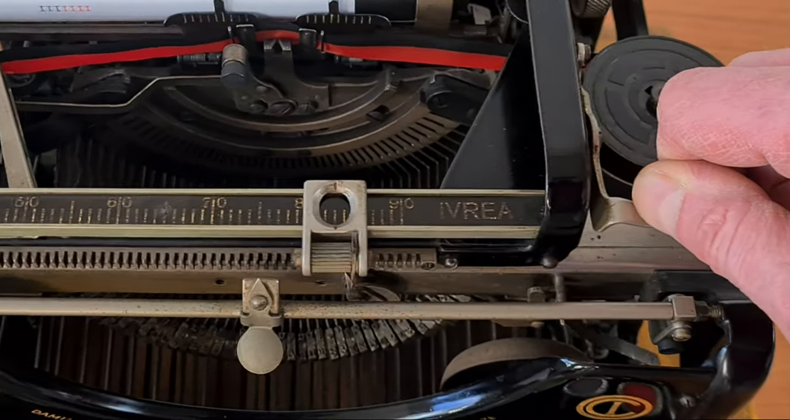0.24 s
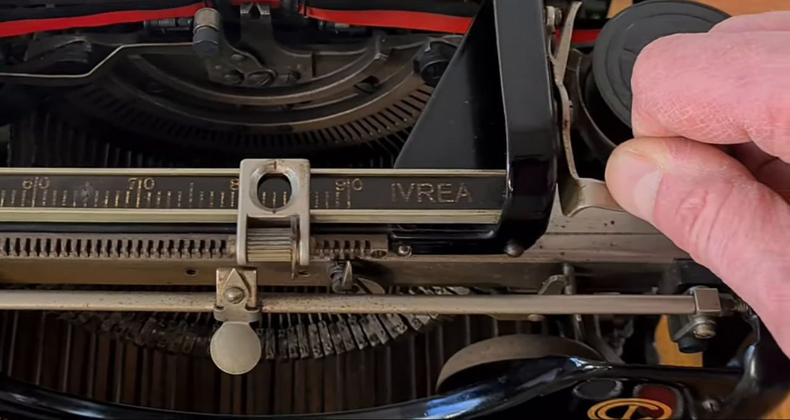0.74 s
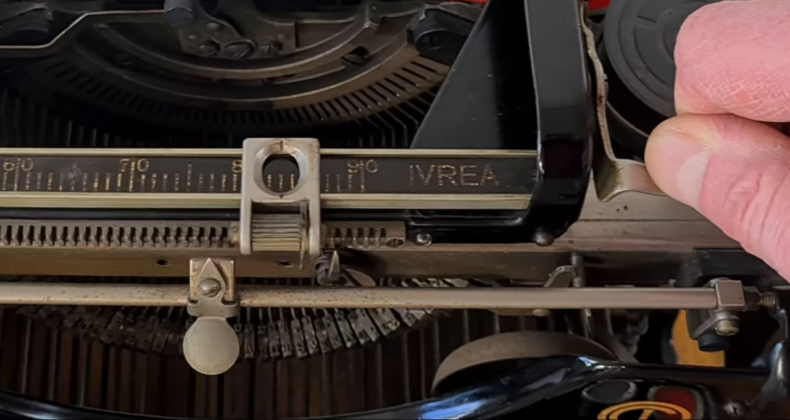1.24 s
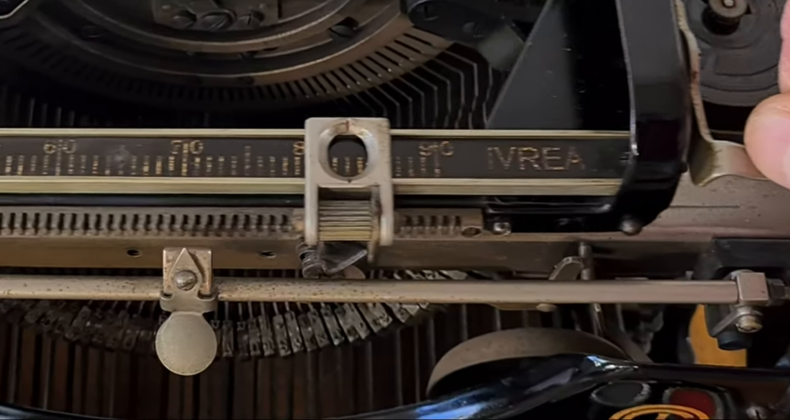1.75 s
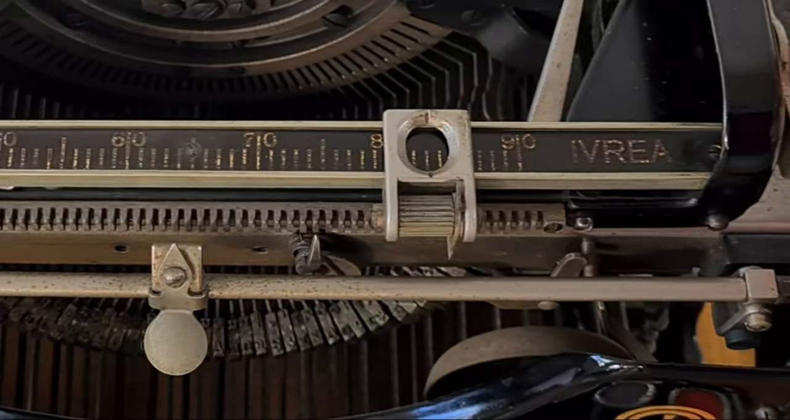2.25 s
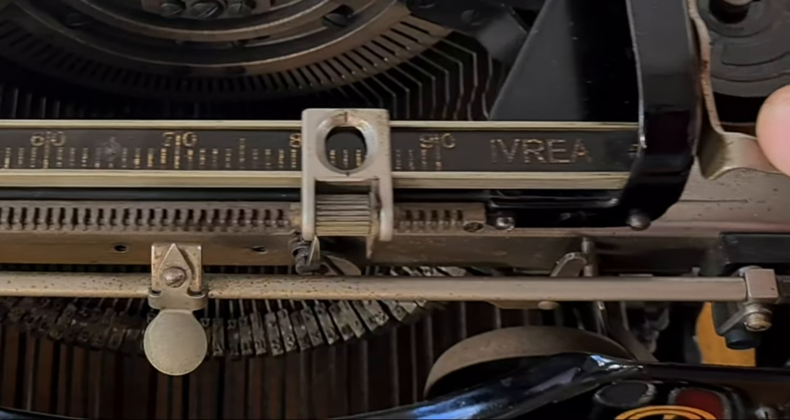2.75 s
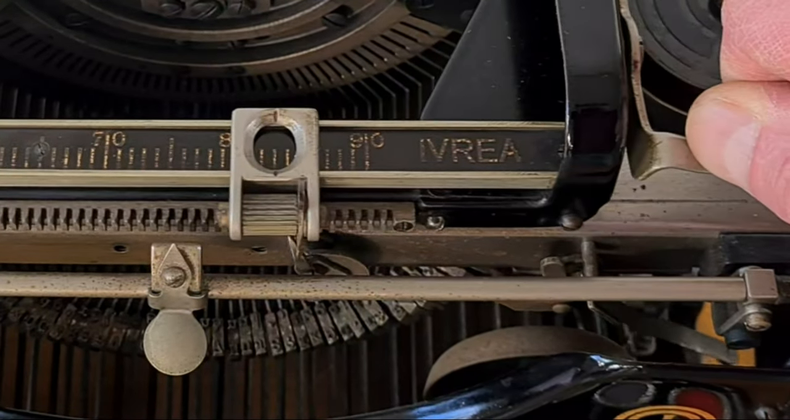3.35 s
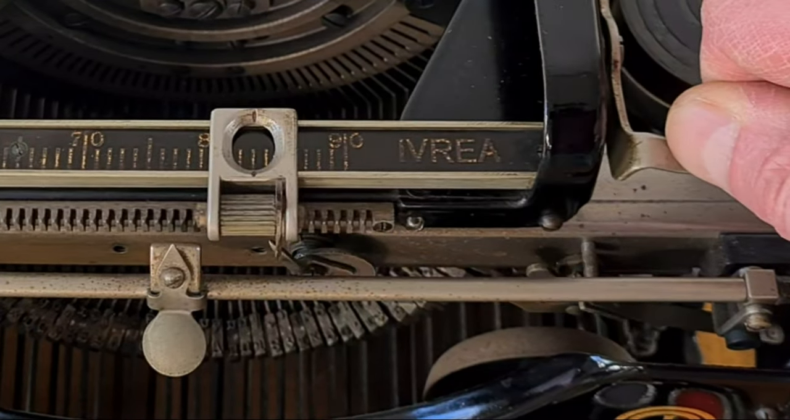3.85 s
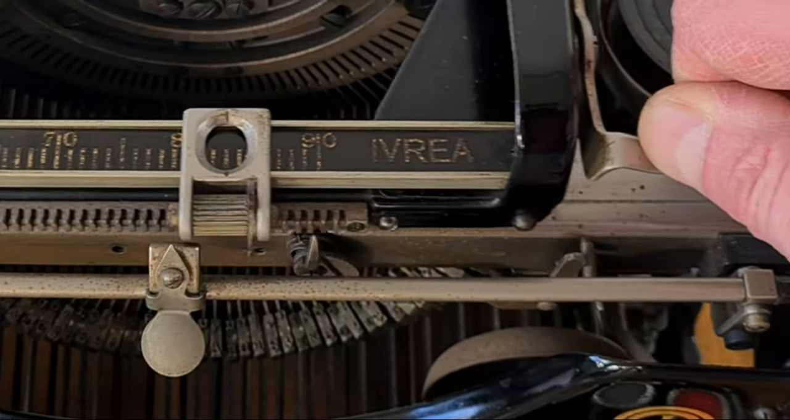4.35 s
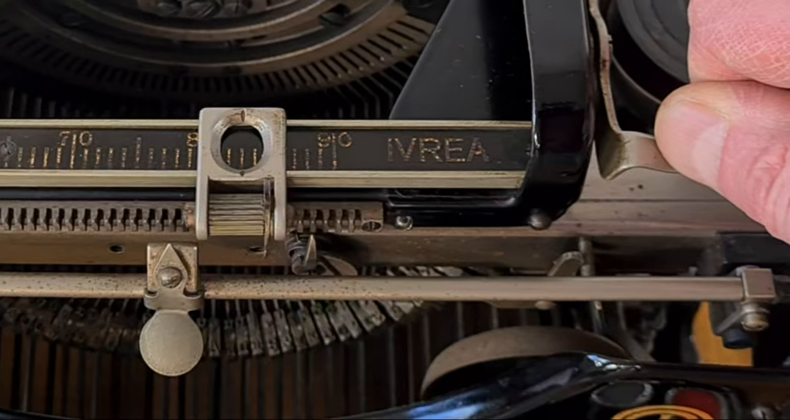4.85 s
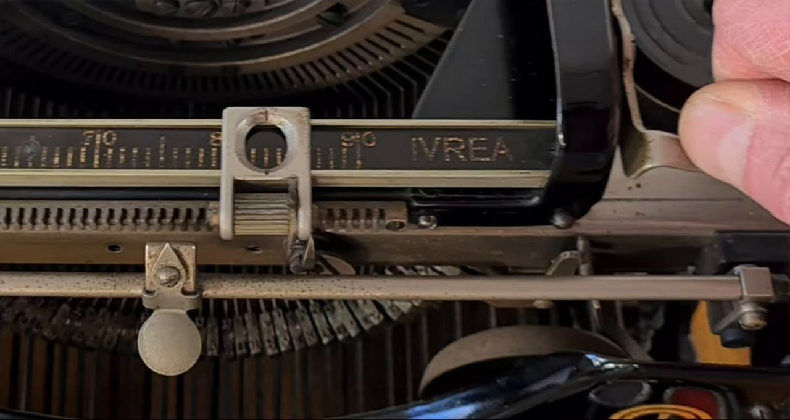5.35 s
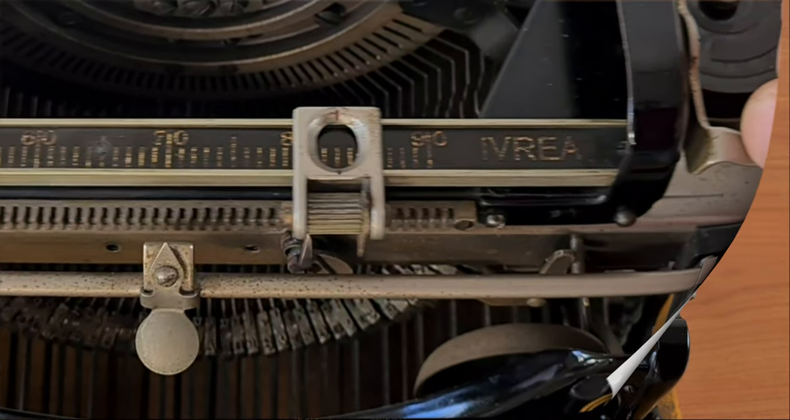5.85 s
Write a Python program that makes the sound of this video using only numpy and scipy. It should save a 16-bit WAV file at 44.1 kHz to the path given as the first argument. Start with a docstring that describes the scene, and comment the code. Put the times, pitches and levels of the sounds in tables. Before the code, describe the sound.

A typewriter carriage is eased back and forth by hand, very close to the microphones. Its stop trips a hammer: a hard clack with a high, shimmering ding that rings for seconds. Coming back, a pawl snaps dryly. After soft drumming and small ticks the ding repeats, then faint contacts lead to a final click. Quiet room, low rumble.

```python
"""Typewriter carriage and margin bell

The carriage of an old typewriter is eased to and fro by hand past its margin stop, close by in a small quiet room.
Going out, the stop trips a hammer: noise bursts and decaying sines for the frame, beating pairs of sines for the bell.
Coming back, the trip pawl snaps over the stop with a dry click, a shorter burst over the same frame modes.
The carriage ticks and drums faintly in shaped noise as it rolls; a low rumble, room air and hiss lie underneath.
"""
import sys
import numpy as np
from scipy import signal
from scipy.fft import rfft, irfft, next_fast_len
from scipy.io import wavfile

SR = 44100
rng = np.random.default_rng(int(sys.argv[2]) if len(sys.argv) > 2 else 0)


def persist_wave(psi):
    """Save psi, clipped to +-1, as 16-bit WAV."""
    counts = np.round(np.clip(psi, -1, 1) * 32767).astype(np.int16)
    wavfile.write(sys.argv[1], SR, np.atleast_2d(counts).T)


N = 268657
TIME = np.arange(N) / SR
AGE = TIME[:SR * 2 // 5]   # time since a contact, s

# hammer blows, the first one long past and nearly died away: t/s, bell level/dB, knock level/dB
BLOWS = [(-2.5, 0, 0), (0.7283, 0, 0), (4.4190, 0, 0)]
# the pawl snaps back: t/s, level/dB, brightness tilt/(dB per octave)
PAWL_SNAPS = [(1.8150, 0, 0), (5.9236, -1.5, 1.3)]
# bell modes in close pairs; the signs tell on which side of a nodal line each microphone lies:
# f/Hz, t60/s, left level/dB, right level/dB, left sign, right sign
BELL_MODES = [(2445.45, 3.0, -37.7, -49.3, -1, 1), (2500.09, 5.6, -53.8, -59.6, 1, 1),
              (5801.8, 2.75, -40.5, -48.5, -1, 1), (5807.55, 2.75, -37.6, -36.2, 1, 1),
              (9568.0, 1.04, -30, -35, -1, -1), (9583.9, .94, -24.3, -30.2, 1, 1),
              (13825.7, .34, -36, -23, 1, 1), (13832.8, .29, -28.5, -30, 1, 1)]
# modes of the frame and its levers: f/Hz, t60/s, level under the hammer/dB, level under the pawl/dB
FRAME_MODES = [(205, .18, -55, -76), (340, .2, -57, -72), (366, .55, -66, -80), (484, .25, -53, -76),
               (570, .09, -60, -59), (770, .06, -51, -58), (905, .09, -33.5, -70), (1420, .22, -48, -53),
               (1515, .3, -48, -67), (1670, .1, -49, -63), (2950, .1, -51, -66), (3350, .07, -44, -60),
               (3500, .08, -47, -61), (4850, .18, -47, -61), (6010, .1, -57, -53), (11930, .2, -46, -60),
               (14585, .08, -52, -45), (15612, .13, -38, -55)]
# share of the metal clatter that both microphones have in common: f/Hz, likeness (0-1)
CLATTER_SHARED = [(200, .9), (700, .75), (1200, .35), (5000, .12), (15000, .05)]
# the same for dull bumps and backgrounds: f/Hz, likeness (0-1)
ROOM_SHARED = [(50, .99), (90, .97), (150, .87), (400, .7), (1200, .3), (4000, .1)]


def from_db(db):
    """Decibels to gain."""
    return 10 ** (np.asarray(db) / 20)


def pan(db):
    """Stereo gains that raise the left and lower the right by the same dB."""
    return from_db([[db], [-db]])


def rms_one(x):
    """Scale to unit power."""
    return x / np.sqrt(np.mean(x ** 2) + 1e-30)


def in_time(rows, column=1):
    """A control curve at every sample."""
    rows = np.array(rows)
    return np.interp(TIME, rows[:, 0], rows[:, column])


def at_hz(points, hz):
    """Read a table on a log-frequency axis."""
    known, values = np.transpose(points)
    return np.interp(np.log(np.maximum(hz, 1)), np.log(known), values)


def noise(colour, likeness, size, tilt_db=0):
    """Stereo noise of a given colour and left-right likeness; rms 1. A positive tilt thins the lower octaves."""
    padded = next_fast_len(size)
    hz = np.arange(padded // 2 + 1) * SR / padded
    mid, side = rfft(rng.standard_normal((2, padded)))
    alike = np.clip(at_hz(likeness, hz), 0, 1)
    pair = np.sqrt(1 + alike) * mid + np.sqrt(1 - alike) * side * [[1], [-1]]
    gain = from_db(at_hz(colour, hz) + tilt_db * np.log2(hz + 1))
    return rms_one(irfft(pair * gain, padded)[:, :size])


def fade(age, t60, rise):
    """Envelope of a blow: a quick rise, then an exponential decay."""
    decay = np.exp(-np.minimum(np.log(1000) * age / t60, 40))
    return (1 - np.exp(-age / rise)) * decay


def ring(age, hz, t60, rise):
    """One struck mode: a decaying sine, silent before the blow."""
    age = np.maximum(age, 0)
    return fade(age, t60, rise) * np.sin(2 * np.pi * hz * age)


def chatter(depth_db, per_s):
    """Loose parts touch unevenly: a gain that wanders at random many times a second."""
    steps = rng.standard_normal(len(AGE))
    wander = np.interp(AGE * per_s, np.arange(len(steps)), steps)
    return rms_one(from_db(depth_db * wander))


def waver(per_s):
    """A slow random wandering with a spread of about 1."""
    steps = rng.standard_normal(len(AGE))
    return np.interp(TIME * per_s, np.arange(len(steps)), steps)


def add(track, start, sound):
    """Mix a short sound into a track."""
    first = round(start * SR)
    track[:, first:first + sound.shape[1]] += sound[:, :N - first]


def bell(level_db=0.3, rise=.002, beat_lag_s=.016, fill_s=.1):
    """The dome is not quite round, so each mode has a twin and the two beat."""
    # while the room fills, reflections thin the lowest note on the left and swell it on the right
    fill_start_db = np.array([[-3.5], [7.5]])
    out = np.zeros((2, N))
    for start, blow_db, _ in BLOWS:
        for k, (hz, t60, left_db, right_db, left_sign, right_sign) in enumerate(BELL_MODES):
            span = slice(*np.searchsorted(TIME, [start, start + 2 * t60]))
            age = TIME[span] - start
            heard = from_db([[left_db], [right_db]]) * [[left_sign], [right_sign]]
            if k == 0:
                heard = heard * from_db(np.exp(-age / fill_s) * fill_start_db)
            # the beats run a little late after the blow
            tone = np.sin(2 * np.pi * hz * (age - beat_lag_s))
            out[:, span] += from_db(level_db + blow_db) * heard * fade(age, t60, rise) * tone
    return out


def shaken_bell(rise=.002):
    """The pawl's snap travels through the frame and freshens one long bell mode."""
    # left level/dB, right level/dB
    shake_db = (-66, -60.5)
    hz, t60, *_ = BELL_MODES[3]
    rings = sum(from_db(snap_db) * ring(TIME - start, hz, t60, rise) for start, snap_db, _ in PAWL_SNAPS)
    return from_db(shake_db)[:, None] * rings


def hammer(crack_db=-24.5, crack_t60=.055, rattle_db=-39.5, rattle_t60=.11, pan_db=1.1):
    """The hammer's blow: a crack, the rattle of its linkage and the ring of the frame."""
    # colour of the clatter: f/Hz, level/(dB per Hz)
    hammer_colour = [(120, -18), (400, -8), (630, -8), (850, 2), (1150, -2), (1500, 1.5), (2100, -9),
                     (3300, 0), (5000, -2.5), (7000, -5.5), (9500, -2), (12000, -1), (15500, 0),
                     (17000, -20)]
    out = np.zeros((2, N))
    for start, _, knock_db in BLOWS:
        if start >= 0:
            crack = from_db(crack_db) * fade(AGE, crack_t60, rise=.001)
            rattle = from_db(rattle_db) * fade(AGE, rattle_t60, rise=.004) * chatter(depth_db=5.5, per_s=300)
            clatter = (crack + rattle) * noise(hammer_colour, CLATTER_SHARED, size=len(AGE))
            add(out, start, from_db(knock_db) * (clatter + frame([mode[2] for mode in FRAME_MODES])))
    return out * pan(pan_db)


def pawl(crack_db=-26, crack_t60=.022, rattle_db=-44, rattle_t60=.19, pan_db=-.2):
    """The sprung pawl falls on its seat: a click with a shorter crack, a rattle and the ring of the frame."""
    # colour of the clatter: f/Hz, level/(dB per Hz)
    pawl_colour = [(120, -24), (330, -17), (550, -6), (900, -6), (1350, 3), (2100, -11), (3600, -1.5),
                   (6000, -3), (8000, -8), (11500, 4), (15200, 4), (17000, -14)]
    out = np.zeros((2, N))
    hz, _, _, modes_db = np.transpose(FRAME_MODES)
    for start, snap_db, tilt_db in PAWL_SNAPS:
        crack = from_db(crack_db) * fade(AGE, crack_t60, rise=.0012)
        rattle = from_db(rattle_db) * fade(AGE, rattle_t60, rise=.003) * chatter(depth_db=7, per_s=220)
        clatter = (crack + rattle) * noise(pawl_colour, CLATTER_SHARED, size=len(AGE), tilt_db=tilt_db)
        tilted_db = modes_db + tilt_db * np.log2(hz / hz[-1])
        add(out, start, from_db(snap_db) * (clatter + frame(tilted_db)))
    return out * pan(pan_db)


def frame(levels_db, spread_s=.0002, rise=.0008):
    """The frame rings; each mode radiates from its own place and so reaches one microphone first."""
    lags = rng.uniform(-spread_s, spread_s, len(FRAME_MODES))
    signs = rng.choice([-1, 1], len(FRAME_MODES))
    out = np.zeros((2, len(AGE)))
    for (hz, t60, *_), level_db, lag, sign in zip(FRAME_MODES, levels_db, lags, signs):
        ages = AGE + [[lag / 2], [-lag / 2]]
        out += sign * from_db(level_db) * ring(ages, hz, t60, rise)
    return out


def carriage(tick_t60=.06, bump_t60=.14, lever_hz=1650, lever_t60=.045, rebound_s=.011, rebound_db=-12):
    """Light contacts along the rail: a gritty tick over a dull bump and a lever's ring, then a soft rebound."""
    # contacts: t/s, level/dB, knock in the frame and ring of a lever, both as level relative to the tick/dB
    contacts = [(0.051, -61.5, -16, -25), (1.517, -72, -12, -3), (1.527, -67, -10, -1),
                (3.118, -68, -2, -25), (5.531, -68, -16, -18), (5.700, -74, 7, 1), (5.729, -75, 6, 1),
                (5.755, -77, -3, -6), (5.921, -57, -12, -12)]
    # colours of the tick and of the bump: f/Hz, level/(dB per Hz)
    tick_colour = [(200, -20), (900, -8), (1700, -2), (2600, -4), (4500, 6), (6500, -1), (9000, 1),
                   (15000, -3), (17000, -15)]
    bump_colour = [(100, -6), (330, 0), (600, -7), (1100, -16), (1800, -10), (3000, -26), (16000, -45)]
    out = np.zeros((2, N))
    for start, tick_db, bump_db, lever_db in contacts:
        for delay, touch_db in ((0, 0), (rebound_s, rebound_db)):
            grit = fade(AGE, tick_t60, rise=.001) * chatter(depth_db=4, per_s=500)
            tick = noise(tick_colour, CLATTER_SHARED, size=len(AGE)) * grit
            bump = noise(bump_colour, ROOM_SHARED, size=len(AGE)) * fade(AGE, bump_t60, rise=.002)
            lever = ring(AGE, lever_hz, lever_t60, rise=.001)
            contact = tick + from_db(bump_db) * bump + from_db(lever_db) * lever
            add(out, start + delay, from_db(tick_db + touch_db) * contact)
    return out


def rolling(ease_s=.12, pan_db=-.6):
    """The carriage drums on the desk: low noise swells with each push, holds as it moves and dies as it stops."""
    # the hand moves the carriage along its rail: t/s, length/s, rolling level/dB
    pushes = [(0.0, .85, -66), (1.57, .33, -64), (1.95, .18, -60), (2.85, .2, -61.5)]
    # colour of the drumming: f/Hz, level/(dB per Hz)
    roll_colour = [(50, -25), (72, -5), (88, 0), (108, -8), (130, -28), (300, -52), (1000, -80)]
    motion = np.zeros(N)
    for start, length, push_db in pushes:
        end = start + length
        speed = np.interp(TIME, [start - ease_s, start, end, end + ease_s], [0, 1, 1, 0])
        motion += from_db(push_db) * speed ** 2
    return motion * noise(roll_colour, ROOM_SHARED, size=N) * pan(pan_db)


def room(x, build_s=.012):
    """Diffuse reflections that build up, then die sooner in the treble; unit energy."""
    # room decay: f/Hz, t60/s
    decay_times = [(200, .45), (1500, .52), (4000, .5), (9000, .35), (15000, .28)]
    age, response = TIME[:SR * 3 // 4], 0
    edges = np.geomspace(100, 18000, 9)   # band edges, Hz
    for low, high in zip(edges, edges[1:]):
        band_filter = signal.butter(2, [low, high], "band", fs=SR, output="sos")
        band = signal.sosfilt(band_filter, rng.standard_normal((2, len(age))))
        t60 = at_hz(decay_times, np.sqrt(low * high))
        response = response + band * np.exp(-np.log(1000) * age / t60)
    response = rms_one(response * (1 - np.exp(-age / build_s))) / np.sqrt(len(age))
    return signal.fftconvolve(x, response, axes=1)[:, :N]


def background(rumble_start_db=-59.5, sink_db_per_s=.55, waver_db=1.2, wavers_per_s=4, pan_db=-.6):
    """A slowly sinking, wavering low rumble and room air, both shaped noise, and a little white hiss."""
    # air and hiss are stronger at first, then sink: t/s, air level/dB, hiss level/dB
    quiet = [(0, -72, -83.5), (0.7, -75.5, -85.5), (1.1, -77, -103), (2.5, -76.3, -115), (4.0, -78.2, -118),
             (6.09, -77, -116)]
    # colours of the rumble and of the air: f/Hz, level/(dB per Hz)
    rumble_colour = [(20, -35), (33, -29), (42, -8), (50, 1.5), (60, -4), (72, -10), (90, -11), (108, -19),
                     (130, -30), (300, -52), (2000, -90)]
    air_colour = [(30, 0), (130, 1), (200, 1), (270, -7), (400, -7), (700, -12), (1100, -17), (1500, -15),
                  (2200, -26), (4500, -27), (7000, -41), (10000, -34.5), (16000, -36.5)]
    rumble_db = rumble_start_db - sink_db_per_s * TIME + waver_db * waver(wavers_per_s)
    rumble = from_db(rumble_db) * noise(rumble_colour, ROOM_SHARED, size=N)
    air = from_db(in_time(quiet)) * noise(air_colour, ROOM_SHARED, size=N)
    hiss = from_db(in_time(quiet, column=2)) * rng.standard_normal(N)   # same on both sides
    return (rumble + air) * pan(pan_db) + hiss


def scene(hammer_room_db=-16, pawl_room_db=-19.5, bell_room_db=-27):
    """Mechanism and bell, each with its share of room, over the rolling carriage and the background."""
    dings = bell() + shaken_bell()
    knocks = hammer()
    clicks = pawl() + carriage()
    sent = from_db(hammer_room_db) * knocks + from_db(pawl_room_db) * clicks + from_db(bell_room_db) * dings
    return knocks + clicks + dings + room(sent) + rolling() + background()


def record(dry, cutoff_hz=16600):
    """The top is cut steeply by an elliptic low-pass."""
    return signal.sosfilt(signal.ellip(10, .1, 80, cutoff_hz, fs=SR, output="sos"), dry)


dry = scene()
out = record(dry)
persist_wave(out)
```